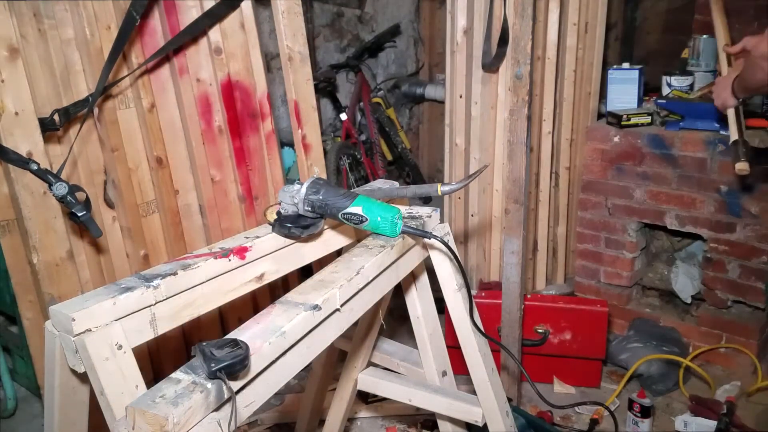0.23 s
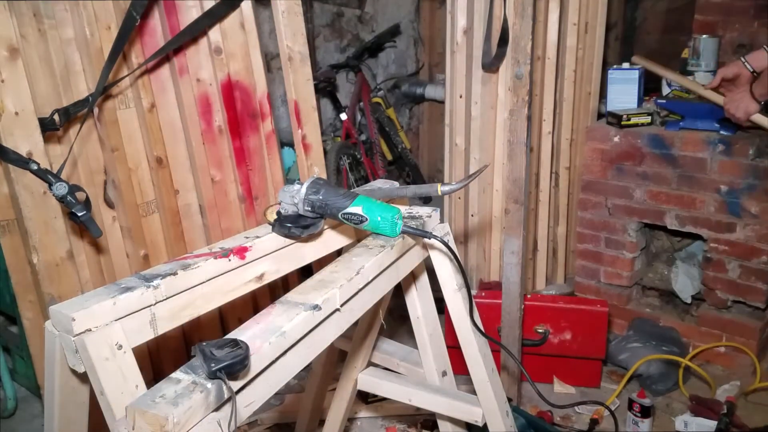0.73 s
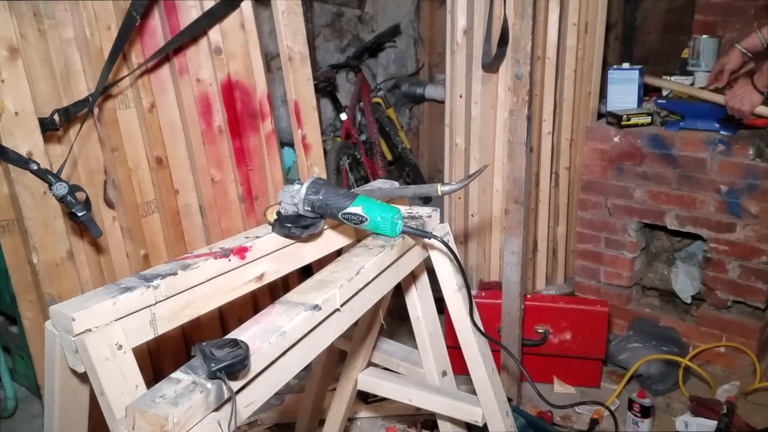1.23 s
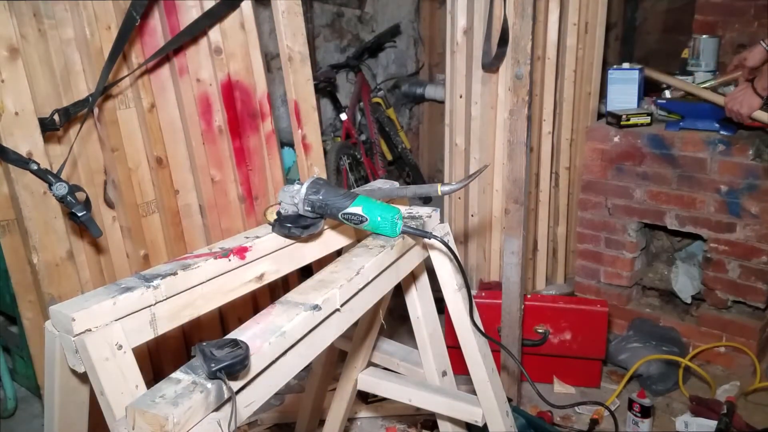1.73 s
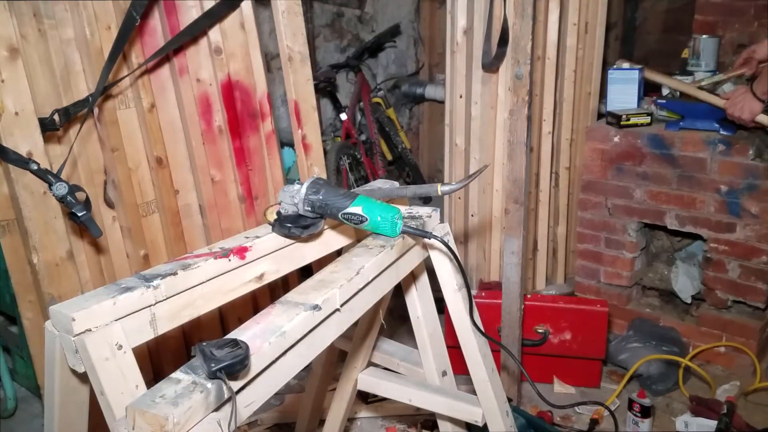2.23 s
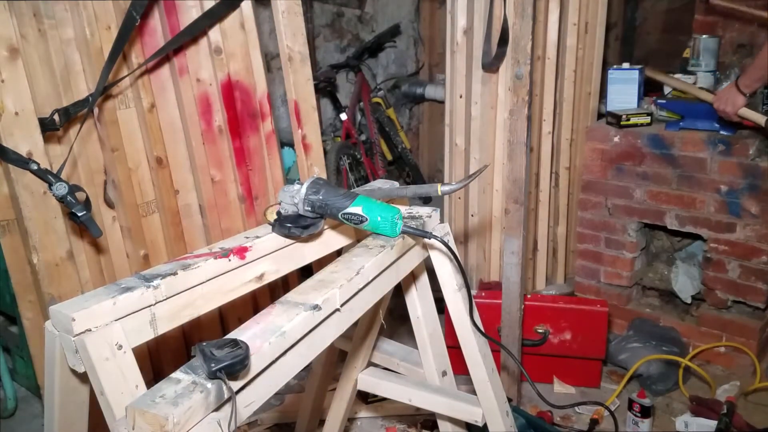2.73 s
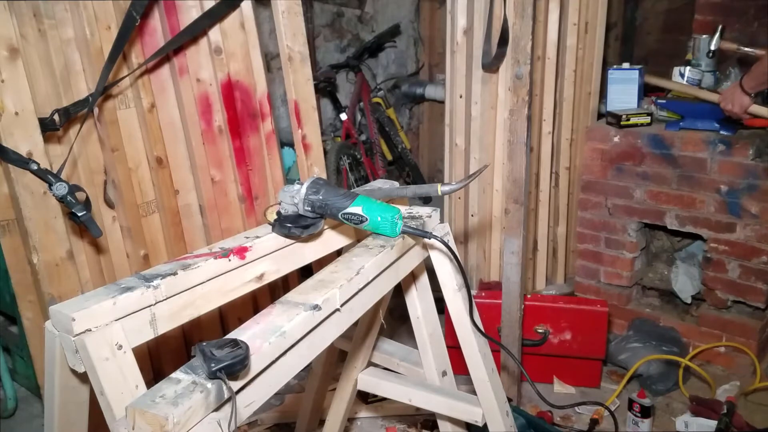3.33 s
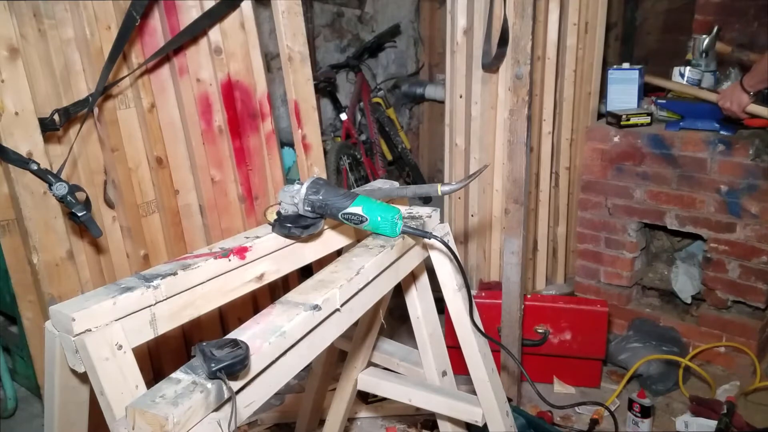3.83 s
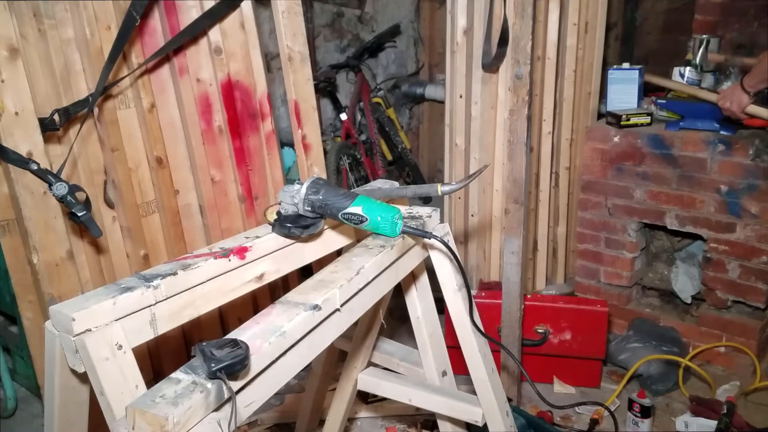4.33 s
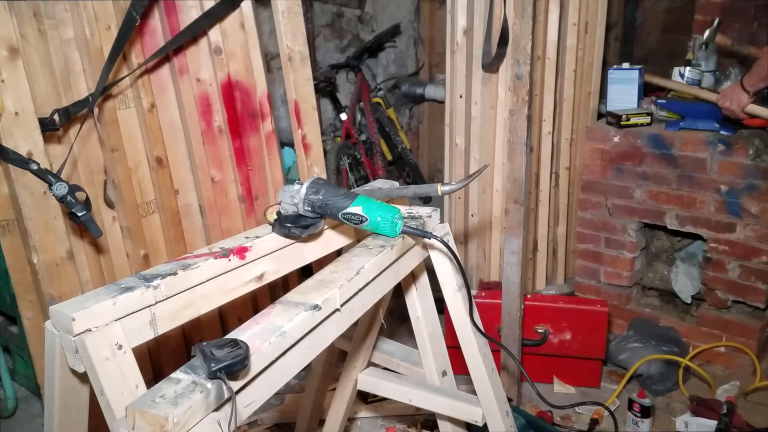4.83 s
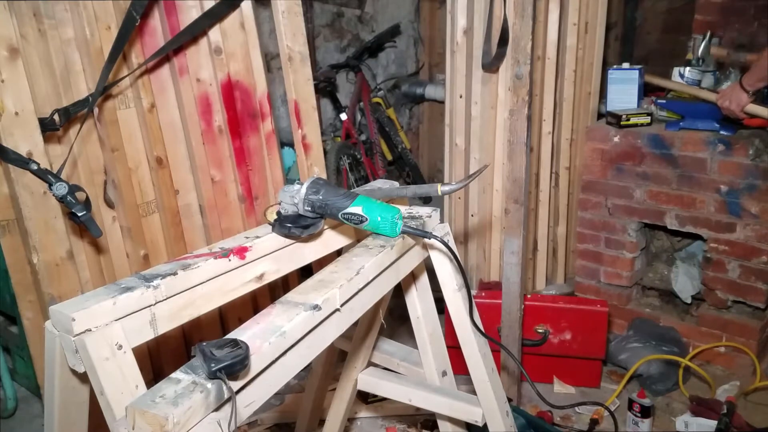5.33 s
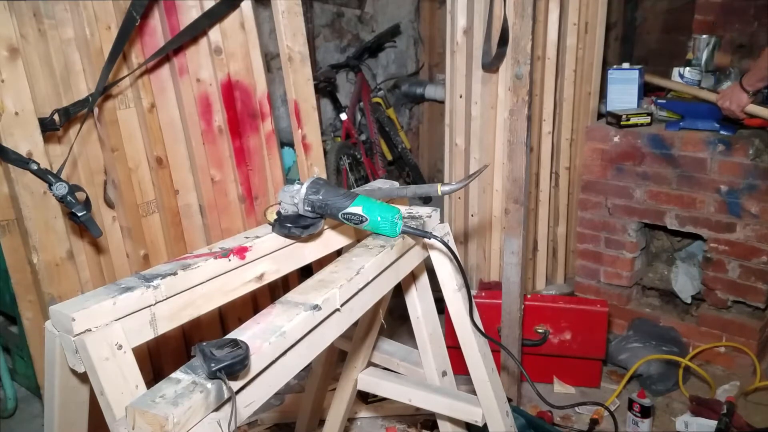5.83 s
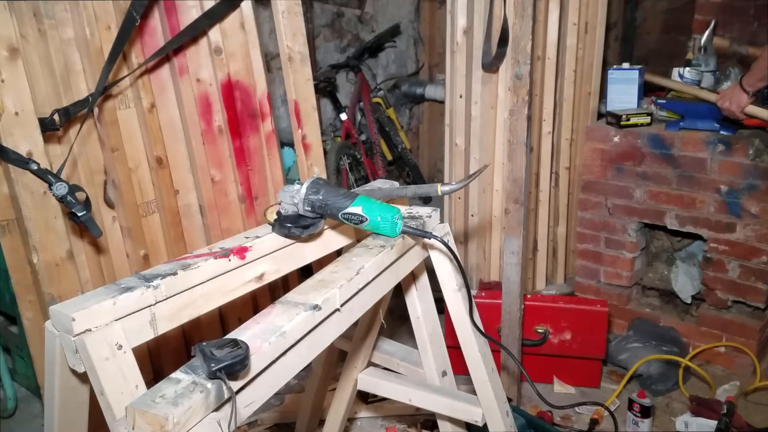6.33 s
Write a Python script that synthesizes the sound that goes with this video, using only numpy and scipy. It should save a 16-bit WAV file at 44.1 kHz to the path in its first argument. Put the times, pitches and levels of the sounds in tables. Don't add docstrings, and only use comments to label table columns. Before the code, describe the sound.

Wooden knocks, scrapes and small metal ticks as tools are shuffled, then nine hard, ringing hammer blows on a nail in an even run.

```python
import sys
import numpy as np
from scipy import signal
from scipy.fft import rfft, irfft
from scipy.io import wavfile
from scipy.ndimage import uniform_filter1d

SR = 44100
rng = np.random.default_rng(int(sys.argv[2]) if len(sys.argv) > 2 else 0)


def bounce(signal):
    frames = np.transpose(np.atleast_2d(signal))
    limited = np.clip(frames, -1, 1)
    pcm = np.round(limited * 32767).astype(np.int16)
    wavfile.write(sys.argv[1], SR, pcm)


def to_linear_factor(level_db):
    exponent = np.asarray(level_db, float) / 20
    return 10 ** exponent


N = 291060
HALF = SR // 2
GRAIN_S, GRAIN_DB = 0.003, 2.5

# f/Hz, T60/s
ROOM_DECAY = [(120, 0.2), (500, 0.39), (2000, 0.35), (6000, 0.34), (12000, .2)]
# f/Hz, level/dB, T60/s
BENCH = [(151, -8, .27), (226, -1, .19), (277, -6, .15), (304, -12, .15)]
BOOM = [(77.4, -12, .6), (94.8, 0, .22), (83.6, -11, .6), (68.7, -26, .8), (54, -18, .25), (118, -3, .13),
        (88, -7, .3)]
HEAD = [(3854, -4, .58), (4683, -5, .24), (5354, -4, .2), (5470, -7, .25)]
CHEEK = [(4210, 0, .27), (6704, -11, .16)]
# f/Hz, level/dB, T60/s
TOUCH = [(3060, 2, .15), (3461, 4, .12), (3854, -11, .3), (4215, -6, .25), (5472, -7, .27), (6700, -8, .1),
         (10257, -13, .2), (10812, -15, .18), (11388, -9, .18), (11829, -17, .15)]
BLOCK = [(495, 2, .2), (872, 0, .2), (1647, -18, .12), (2030, -16, .12), (3130, -12, .1), (4230, -22, .1)]
HANDLE = [(501, -6, .25), (818, -2, .18), (933, -3, .14), (1098, -5, .15), (1593, -7, .16),
          (3440, -16, .14)]
OFFCUT = [(528, 0, .12), (694, -1, .06), (926, -5, .1), (1335, -8, .12)]


def unit(x):
    return x / np.sqrt(np.mean(x ** 2) + 1e-20)


def along(points, hz):
    f, v = np.transpose(points)
    return np.interp(np.log(hz + 1), np.log(f + 1), v)


def add(track, s, sound):
    part = track[max(round(s * SR), 0):][:len(sound)]
    part += sound[:len(part)]


def waver(step_s, count):
    knots = rng.standard_normal((count, int(0.5 / step_s) + 2))
    position = np.arange(HALF) / SR / step_s
    return np.array([np.interp(position, np.arange(len(k)), k) for k in knots])


def rise(seconds):
    return 1 - np.exp(-np.arange(HALF) / SR / seconds)


def swell(start, end, db, rise_rate, fall_rate):
    t = np.arange(N) / SR
    climb = np.maximum(rise_rate * (start - t), 0)
    fall = np.maximum(fall_rate * (t - end), 0)
    return to_linear_factor(db - climb - fall)


def noise(spectrum, patchy_db):
    hz, _, z = signal.stft(rng.standard_normal(N), SR, nperseg=1024)
    field = uniform_filter1d(rng.standard_normal(z.shape), size=8, axis=0)
    field = uniform_filter1d(field, size=3, axis=1)
    gain = to_linear_factor(along(spectrum, hz)[:, None] + patchy_db * unit(field))
    return unit(signal.istft(z * gain, SR, nperseg=1024)[1][:N])


def narrow(hz, width_hz):
    f = np.fft.rfftfreq(N, 1 / SR)
    resonance = 1 / (1 + ((f - hz) / width_hz) ** 2)
    return unit(irfft(rfft(rng.standard_normal(N)) * resonance, N))


def burst(spectrum, t60s):
    hz, t, z = signal.stft(rng.standard_normal(HALF), SR, nperseg=512)
    gain = unit(to_linear_factor(along(spectrum, hz)))[:, None]
    fade = to_linear_factor(-60 * t / along(t60s, hz)[:, None])
    return signal.istft(z * gain * fade, SR, nperseg=512)[1][:HALF]


def ring(modes, scatter_db=1.5):
    t = np.arange(HALF) / SR
    strength = rng.standard_normal((len(modes), 1))
    flutter = 1.5 * waver(0.025, count=len(modes))
    chance = scatter_db * (strength + flutter)
    out = np.zeros(HALF)
    for k, (hz, db, t60) in enumerate(modes):
        out += (-1) ** k * to_linear_factor(db + chance[k] - 60 * t / t60) * np.sin(2 * np.pi * hz * t)
    return out


def room_hush():
    # f/Hz, density level/dB per Hz
    hush_spectrum = [(13, -19), (22, -1), (32, 0), (109, 1.5), (270, -5), (356, -9), (387, -7.5),
                     (1410, -17), (1580, -6.5), (2670, -26), (3150, -9), (4140, -25.5), (4500, -22),
                     (6810, -30), (16000, -27.5)]
    return to_linear_factor(-55.5) * noise(hush_spectrum, patchy_db=0)


def rumble():
    shifts_of_weight = [(1.1, 1.196, -56), (1.6, 1.855, -47), (2.4, 2.443, -60), (2.95, 3.086, -55.5),
                        (3.7, 3.85, -65.5)]
    # f/Hz, density level/dB per Hz
    low_spectrum = [(25, 0), (50, -9.5), (90, 12), (150, -4.5), (230, -13.5), (400, -72)]
    fade = 35
    envelope = sum(swell(a, b, db, fade, fade) for a, b, db in shifts_of_weight)
    return envelope * noise(low_spectrum, patchy_db=4)


def dragging():
    # stop t/s, swell/dB per s, body level/dB, grit level/dB
    strokes = [(.03, 90, -42, -42.5), (0.123, 900, -38.5, -72), (0.212, 606, -40.5, -48),
               (.48, 302, -41, -46), (0.521, 400, -37, -32), (.56, 507, -35, -37.5), (1.64, 130, -57, -55),
               (1.94, 150, -30.5, -47), (2.102, 244, -39, -75), (2.87, 63, -41, -77)]
    # start t/s, end t/s, body level/dB, grit level/dB
    fumbles = [(0.117, 0.276, -48, -53.5), (0.628, 1.16, -50, -53.5), (1.26, 2.214, -51.5, -57.5),
               (2.64, 2.69, -54, -51), (2.717, 3.092, -50.5, -50.5), (3.1, 3.29, -63, -66)]
    # f/Hz, density level/dB per Hz
    drag_spectrum = [(88, -47), (150, -13), (300, -15.5), (461, 2.5), (708, -7.5), (1200, -2),
                     (2600, -14.5), (3380, -84), (5720, -120)]
    # f/Hz, density level/dB per Hz
    grit_spectrum = [(1410, -7), (2400, -4), (2880, 1.5), (4320, -12), (6900, -24), (8550, -38),
                     (11600, -24.5), (15100, -34), (16000, -48.5)]
    drag = noise(drag_spectrum, patchy_db=1.5)
    grit = noise(grit_spectrum, patchy_db=1.5)
    out = np.zeros(N)
    for s, rate, body_db, grit_db in strokes:
        out += swell(s, s, 0, rate, 440) * (to_linear_factor(body_db) * drag + to_linear_factor(grit_db) * grit)
    for a, b, body_db, grit_db in fumbles:
        out += swell(a, b, 0, 750, 120) * (to_linear_factor(body_db) * drag + to_linear_factor(grit_db) * grit)
    return out


def jingle():
    # t/s, upper level/dB, lower level/dB
    shakes = [(1.702, -66, -67), (1.864, -44.5, -54), (1.966, -57, -60), (2.165, -51, -53),
              (2.836, -58, -65)]
    upper, lower = narrow(11900, width_hz=190), narrow(6250, width_hz=190)
    out = np.zeros(N)
    for s, upper_db, lower_db in shakes:
        out += swell(s, s, 0, 1464, 220) * (to_linear_factor(upper_db) * upper + to_linear_factor(lower_db) * lower)
    return out


def chatter():
    # t/s, level/dB
    nudges = [
        (2.85, -45),
        (2.978, -58),
        (3.078, -57.5),
    ]
    envelope = sum(swell(s, s, db + 8, 580, 90) for s, db in nudges)
    return envelope * narrow(1830, width_hz=90)


def steel_ticks():
    # t/s, peak level/dB, T60/s
    contacts = [(0.0378, -39, 0.012), (0.5544, -53, 0.025), (1.1957, -25, 0.015), (1.6616, -43, 0.025),
                (2.6414, -47, 0.03)]
    # f/Hz, density level/dB per Hz
    tick_spectrum = [(2500, -24), (5000, -3), (9000, -10), (12500, 10.5), (16000, -7)]
    out, t = np.zeros(N), np.arange(HALF) / SR
    for s, db, t60 in contacts:
        envelope = to_linear_factor(-60 * t / t60) + to_linear_factor(-13)
        add(out, s - 0.0005, to_linear_factor(db - 12.5) * envelope * burst(tick_spectrum, [(8000, 0.15)]))
    return out


def lingering_rings():
    # t/s, modes of the part struck, level/dB
    struck_parts = [(.939, TOUCH, -36), (.94, BOOM, -19), (1.28, BENCH, -27), (1.589, HEAD, -40),
                    (1.589, CHEEK, -42), (.755, BENCH, -33), (.755, OFFCUT, -30), (1.556, OFFCUT, -40),
                    (.002, BENCH, -34), (2.127, TOUCH, -45), (2.127, HEAD, -46), (2.695, BLOCK, -10),
                    (2.82, BLOCK, -30), (1.926, BENCH, -30), (1.589, HANDLE, -20), (1.849, HANDLE, -22),
                    (1.925, HANDLE, -15), (2.127, HANDLE, -19), (2.127, CHEEK, -42)]
    out = np.zeros(N)
    for s, modes, db in struck_parts:
        first_hz = modes[0][0]
        add(out, s, to_linear_factor(db) * rise(3 / first_hz) * ring(modes))
    return out


def knocks():
    # t/s, peak level/dB, thud level/dB, edge level/dB, wood note f/Hz
    held_knocks = [(0.001, -15.5, -13, -46, 1267), (0.205, -47, -21.5, 12.5, 1170),
                   (0.442, -34.5, -14, -6.5, 390), (0.938, -15, -6.5, -11, 393),
                   (1.095, -44, -19.5, -19, 1230), (1.403, -32, -13, -11, 530),
                   (1.556, -32.5, -9, -16, 610), (1.589, -3, -21, -26, 933), (1.737, -37, 5.5, -30, 485),
                   (1.803, -46, -11, -2, 517), (1.927, -8, -11.5, -30, 956), (3.075, -29, -18, -6.5, 840)]
    # t/s, peak level/dB, thud level/dB, edge level/dB, wood note f/Hz
    free_knocks = [(0.117, -28, -1.5, -38, 694), (0.755, -26.5, -4.5, -18, 512),
                   (1.281, -14.5, -6.5, -26, 624), (1.852, -14, -10.5, -32, 1081),
                   (2.125, -7, -28, -22, 803), (2.695, -9.5, -16, -32, 1130), (2.821, -18.5, -12, -35, 427)]
    # f/Hz, density level/dB per Hz
    body_spectrum = [(240, -18.5), (400, -7.5), (537, 2), (1090, -0.5), (1290, -3), (1620, -0.5),
                     (2450, -10), (3390, -12.5), (4500, -31), (5850, -34), (9900, -120)]
    thud_spectrum = [(70, -23), (130, 8.5), (250, 2.5), (400, 2), (600, -57)]
    edge_spectrum = [(2400, -22), (4000, -1.5), (6200, -11), (8600, -22), (11000, -17.5), (13000, -16),
                     (15200, -15), (16500, -36)]
    out, t = np.zeros(N), np.arange(HALF) / SR
    events = [(*k, 0.18) for k in held_knocks] + [(*k, 0.3) for k in free_knocks]
    for s, db, thud_db, edge_db, hz, t60 in events:
        body = burst(body_spectrum, [(500, 0.89 * t60), (4000, 0.86 * t60)])
        body += ring([(hz, -5, 0.89 * t60)])
        thud = to_linear_factor(thud_db) * burst(thud_spectrum, [(200, 1.75 * t60)])
        edge = to_linear_factor(edge_db) * burst(edge_spectrum, [(5000, 1.08 * t60), (13000, t60)])
        direct = 1 + 0.37 * np.exp(-t / 0.00063)
        crack = direct * to_linear_factor(GRAIN_DB * waver(GRAIN_S, count=1)[0])
        room = to_linear_factor(-11) * rise(0.009) * burst(body_spectrum, ROOM_DECAY)
        impact = rise(0.0017) * (crack * (body + edge) + thud)
        add(out, s - 0.0006, to_linear_factor(db - 10) * (impact + room))
    return out


def clang():
    # f/Hz, width/Hz
    nail_bands = [(5200, 500), (6700, 300), (11000, 500), (13300, 650), (15000, 400)]
    f, t = np.fft.rfftfreq(HALF, 1 / SR), np.arange(HALF) / SR
    bands = np.zeros(len(f))
    for hz, width_hz in nail_bands:
        bands += to_linear_factor(4.5 * rng.standard_normal()) / (1 + ((f - hz) / width_hz) ** 2)
    onset_db = (7.5 + GRAIN_DB * waver(GRAIN_S, count=1)[0]) * np.exp(-t / 0.0076)
    envelope = to_linear_factor(-26 - 60 * t / 0.16 + onset_db)
    return envelope * unit(irfft(rfft(rng.standard_normal(HALF)) * bands, HALF))


def blows():
    # t/s, peak level/dB, face ring level/dB, cheek ring level/dB, claw ring level/dB
    strikes = [(3.891, -2, -15.5, -44.5, -48), (4.235, -1.5, -18.5, -33.5, -41),
               (4.572, -1.5, -23, -33.5, -53), (4.891, 0, -14.5, -27.5, -42),
               (5.204, 3.5, -9.5, -23.5, -29), (5.521, 3, -15, -18.5, -32), (5.851, 2.5, -3, -17, -36),
               (6.184, 4, -1, -25.5, -45.5), (6.506, 5, -9, -18, -33.5)]
    # f/Hz, density level/dB per Hz
    bang_spectrum = [(70, -20.5), (120, -21), (230, -6.5), (420, -3), (800, -2.5), (1300, -4), (1870, -0.5),
                     (2300, -9), (3200, -6), (4200, -18.5), (6500, -31), (9000, -43), (11500, -33.5),
                     (15500, -41)]
    # f/Hz, T60/s
    bang_decay = [(120, 0.81), (400, 0.14), (1100, 0.22), (3000, 0.2), (6000, 0.2), (12000, 0.15)]
    # f/Hz, level/dB, T60/s
    vice_modes = [(382, -25, .6), (518, -11, .18), (790, -12, .18), (1243, -12, .16), (1386, -12, .16),
                  (1523, -12, .2), (1673, -10, .16), (1776, -7, .16), (1836, -7, .18), (1920, -1, .16),
                  (2049, -12, .13), (2608, -12, .19)]
    face_modes = [(2987, 0, .19), (3030, 0, .19)]
    claw_modes = [(8976, -6, .2), (10257, -6, .2), (10815, 0, .2), (10890, -6, .26), (11635, -6, .2)]
    out = np.zeros(N)
    same_bang, same_room = burst(bang_spectrum, bang_decay), burst(bang_spectrum, ROOM_DECAY)
    lead = round(0.002 * SR)
    for s, db, face_db, cheek_db, claw_db in strikes:
        bang = 0.54 * same_bang + 0.5 * burst(bang_spectrum, bang_decay)
        bang += (to_linear_factor(7 + 0.2 * face_db) - 1) * np.diff(bang, prepend=0)
        reverberation = 0.27 * same_room + 0.52 * burst(bang_spectrum, ROOM_DECAY)
        room = to_linear_factor(-13) * rise(0.064) * reverberation
        steel = to_linear_factor(-6) * ring(vice_modes)
        add(out, s - 0.0004, to_linear_factor(db + 1) * (rise(0.0013) * (bang + steel + clang()) + room))
        direct = (bang + 0.43 * np.diff(bang, prepend=0))[:lead]
        add(out, s - 0.0022, to_linear_factor(db - 17) * rise(0.00093)[:lead] * direct)
        give = to_linear_factor(0.26 * db)
        add(out, s, give * to_linear_factor(-10) * rise(0.012) * ring(BENCH, 1))
        add(out, s, give * to_linear_factor(-4) * rise(0.033) ** 2 * ring(BOOM, 0.4))
        head_db = -37 + 2.5 * db
        hammer = [(face_db, face_modes), (head_db, HEAD), (cheek_db, CHEEK), (claw_db, claw_modes)]
        for part_db, modes in hammer:
            add(out, s, to_linear_factor(part_db) * rise(0.001) * ring(modes, 1))
    return out


def scene():
    background = room_hush() + rumble()
    handling = dragging() + jingle() + chatter()
    contacts = steel_ticks() + lingering_rings() + knocks()
    return (background + handling + contacts + blows())[None]


def band_limit(x):
    return signal.sosfilt(signal.butter(12, 16310, fs=SR, output="sos"), x)


def record(dry):
    hz = np.fft.rfftfreq(N, 1 / SR)
    edge_db = -60 * np.clip((hz - 15780) / 260 + 0.5, 0, 1)
    high_pass = hz / (hz - 18j)
    limited = irfft(rfft(dry) * to_linear_factor(edge_db) * high_pass, N)
    clipped = limited / (1 + np.abs(limited / 1.02) ** 12) ** (1 / 12)
    return band_limit(np.clip(clipped, -1, 1))


dry = scene()
out = record(dry)
bounce(out)
```